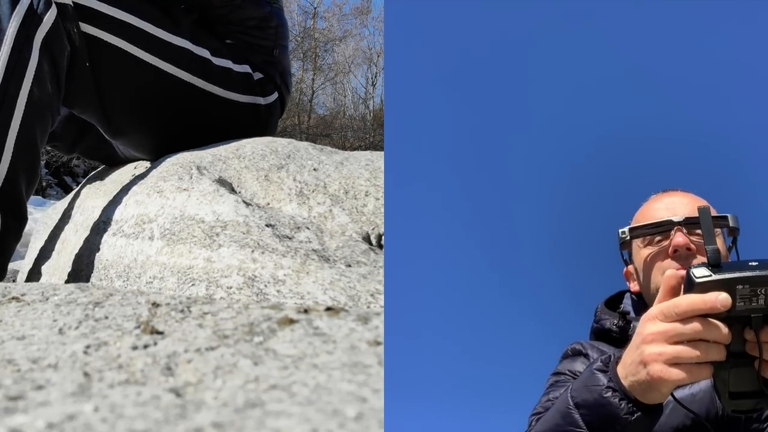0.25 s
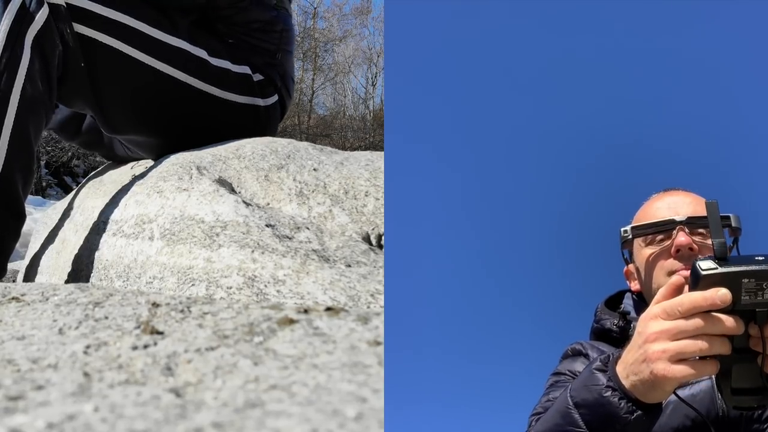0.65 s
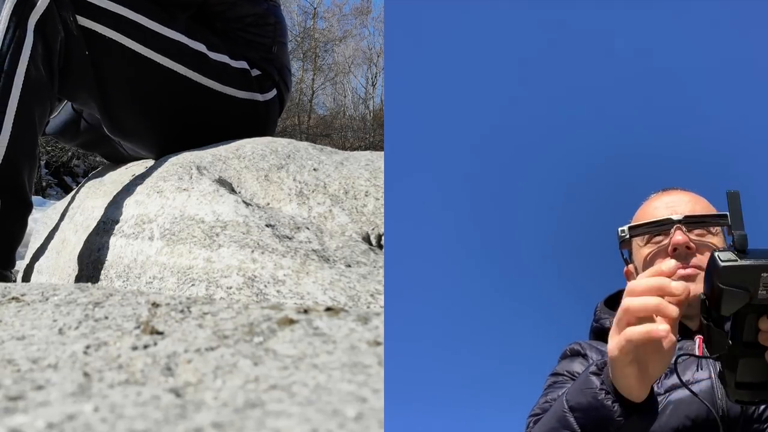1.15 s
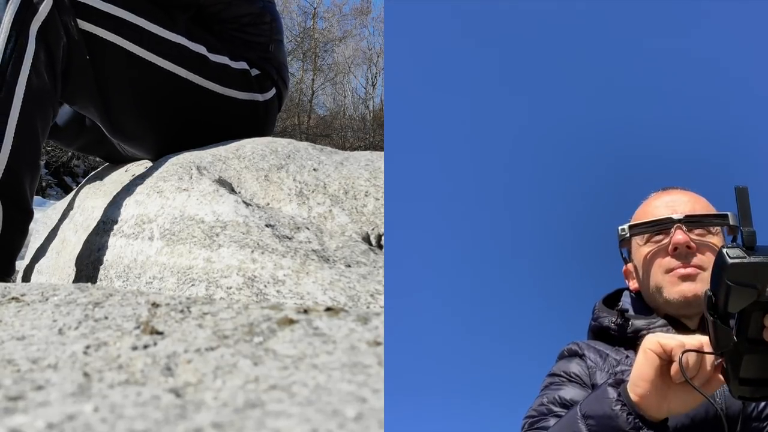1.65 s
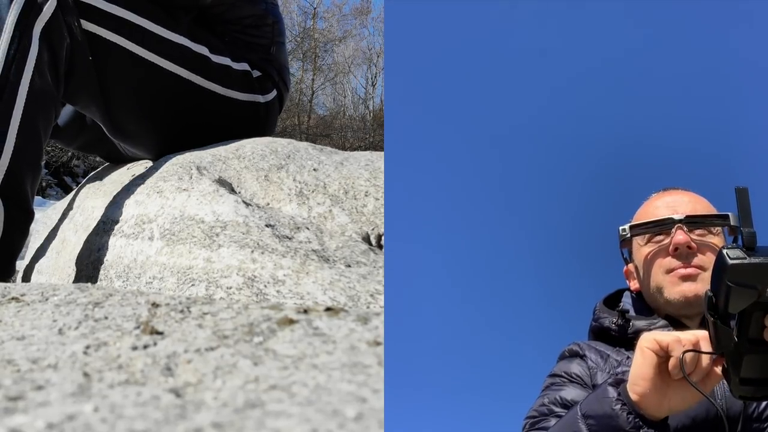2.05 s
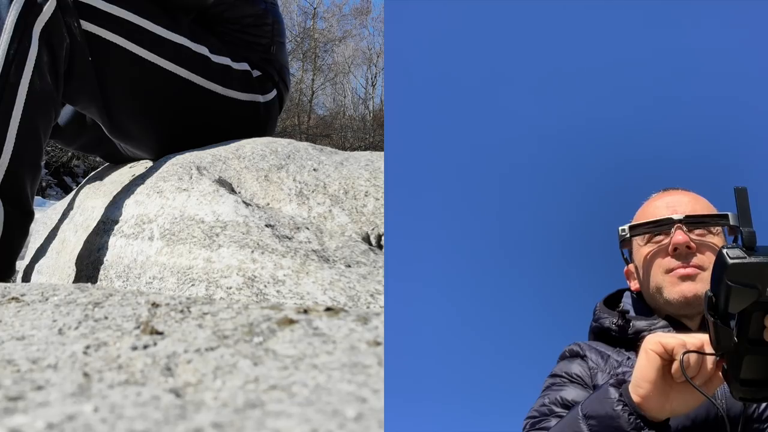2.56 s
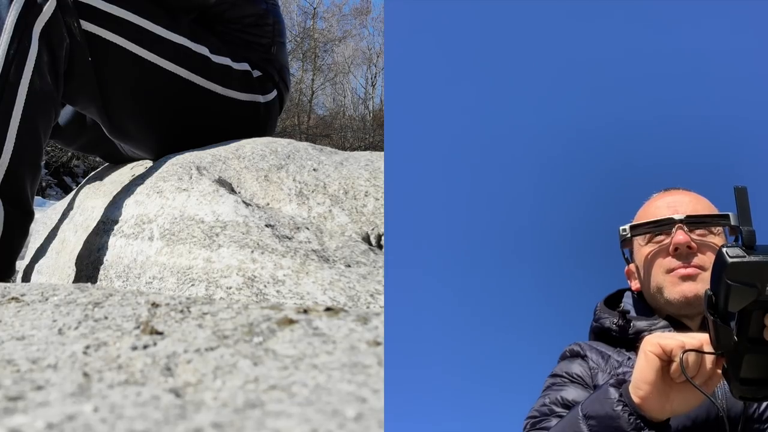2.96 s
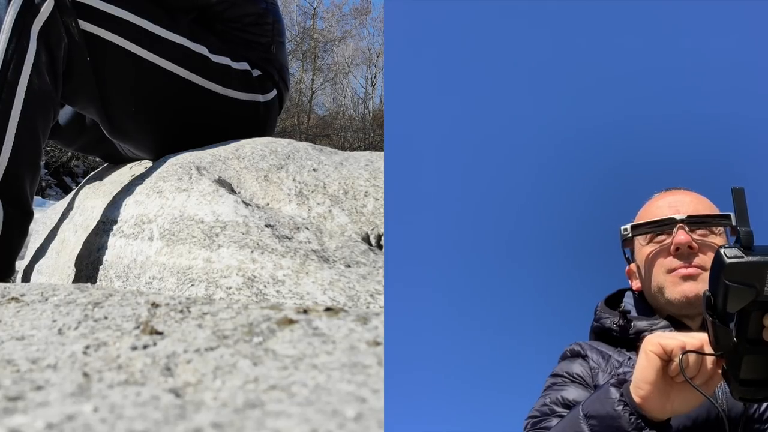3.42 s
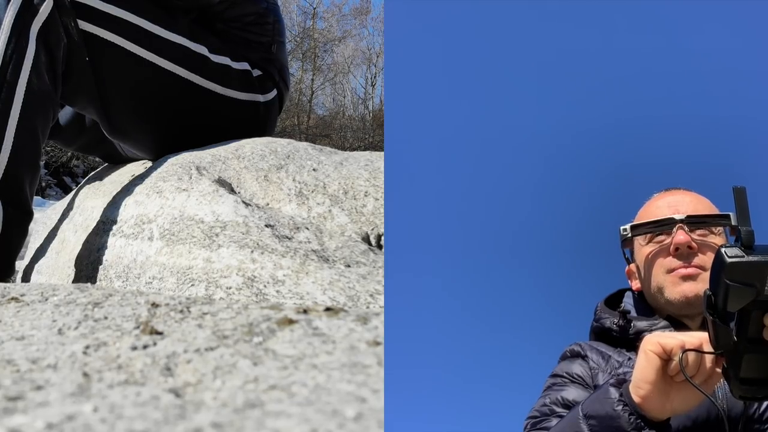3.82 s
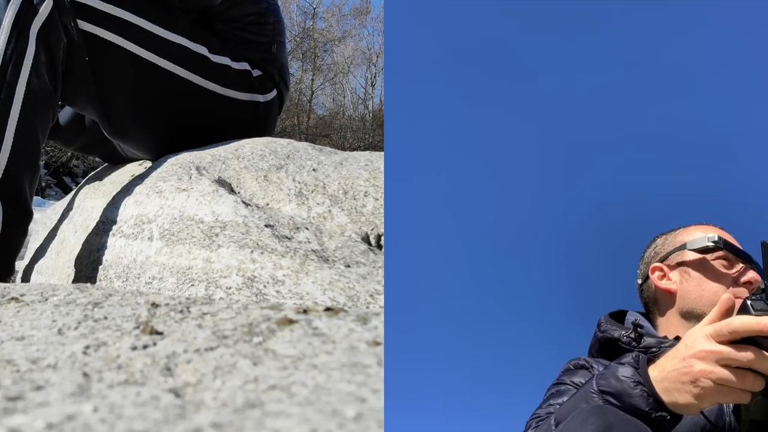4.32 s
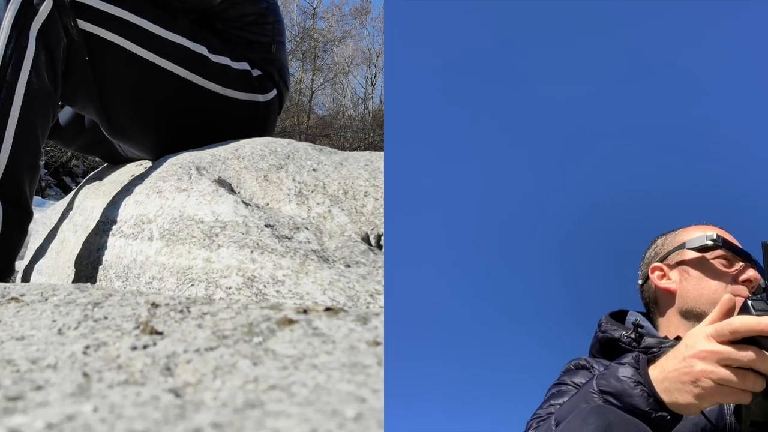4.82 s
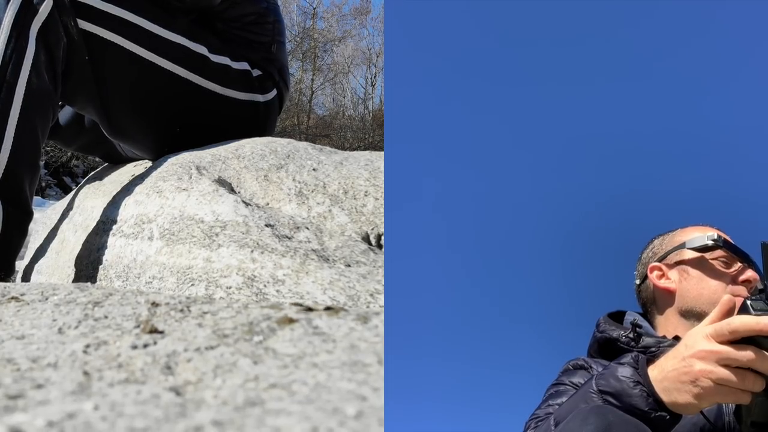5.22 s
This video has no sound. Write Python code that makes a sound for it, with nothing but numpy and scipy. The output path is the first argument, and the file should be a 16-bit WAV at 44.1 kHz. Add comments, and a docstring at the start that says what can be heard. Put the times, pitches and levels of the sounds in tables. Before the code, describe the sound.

Gusty wind and faint fan noise under a deep unsteady hum, until a small drone's whining, buzzing propellers suddenly burst in, climb and level off.

```python
"""Four two-blade rotors speed up in pairs on a hillside: shaft and blade tones are sines that follow each
rotor's speed, motor whine passes through the frame's resonances, and blade hiss is noise the blades chop.
They enter at a cut, already turning. Ahead of it a low machine hum of wavering sines is heard and a sleeve
rustles once (grainy noise); after it another low hum, on 35 Hz multiples, throbs under the rotors.
Wind rumble and a small cooling fan (coloured noise, thin tones) run throughout; two microphone ports
a hand apart hear most of it with a small lag."""
import sys
import numpy as np
from scipy import signal
from scipy.fft import rfft, irfft
from scipy.io import wavfile
from scipy.ndimage import uniform_filter1d

SR = 44100
rng = np.random.default_rng(int(sys.argv[2]) if len(sys.argv) > 2 else 0)


def generate_wav(signal):
    """Clip the signal to [-1, 1] and save it as 16-bit WAV at the path in sys.argv[1]."""
    frames = np.transpose(np.atleast_2d(signal))
    scaled = np.clip(frames, -1, 1) * 32767
    pcm = np.round(scaled).astype(np.int16)
    wavfile.write(sys.argv[1], SR, pcm)


N = 241646
T = np.arange(N) / SR
F = np.maximum(np.fft.rfftfreq(N, 1 / SR), 1)  # at least 1 Hz, so that its logarithm exists

CUT_S = 4.3  # a cut: the rotors are heard from here, already turning
FULL_HZ = 362.4  # blade rate at which the rotor levels are stated
LAG_S = 20.5 / SR  # between the ports

# Rotor balance at the ports: (frequency [Hz], left minus right [dB])
ROTOR_PAN = [(110, 4), (200, -2), (380, -3.5), (700, -12), (1000, -10), (1280, -2), (4400, -0.1), (7600, 1),
             (8300, 4.5), (10500, 0.1)]
# Likeness of fan and sleeve noise at the ports: (frequency [Hz], share common to both ports [0-1])
FAN_ALIKE = [(300, 0.6), (1000, 0.21), (3000, 0.41), (5000, 0.07), (9000, 0.74), (12000, 1)]


def rotors():
    """Each rotor sounds at multiples of its blade rate, and all four chop one bed of air noise."""
    # Motion and tones: (pulls ahead at [s], by [Hz], settles at [s], idle blade rate [Hz],
    # blade tone [dB], overtones [dB], tone change at idle [dB], overtone change at idle [dB],
    # fainter before pulling ahead [dB])
    motions = [(4.89, 0, 5.06, 350, -18.5, -24.5, -8, -3, 0), (4.9, 0, 5.12, 327, -32, -26, 3, -4, -0.5),
               (4.84, 32, 5.06, 337, -27.5, -29, -9, -5, 20),
               (5.01, 20, 5.09, 365, -31.5, -32.5, 4.5, 6, 10)]
    # Place on the frame: (shaft tone at full speed [dB], whine offset [dB],
    # left minus right [dB], left leads [rad])
    seats = [(-38, -3.5, 0.2, 0.14), (-43, -3, 1, -0.7), (-42, -24.5, -1, -0.28), (-49, -7.5, 2.7, 0.21)]
    # run-up of a pair: (blade rate at the cut [Hz], rate aimed at [Hz], time constant [s],
    # overtone growth [dB per tenfold speed])
    fast_pair, slow_pair = (165, 410, .45, 66), (124, 424, .7, 40)
    pairs = (fast_pair, slow_pair, slow_pair, fast_pair)
    pull_s = 0.0799  # time taken to pull ahead
    swell_s, swell_db = 0.062, 7  # the blade tones swell just after the cut
    tone_growth_db, waver_db = 30, 2.5  # growth per tenfold speed

    tones, chop, gate = 0, 0, ramp(CUT_S, 0.0053)
    for pair, motion, seat in zip(pairs, motions, seats):
        *run_up, over_growth_db = pair
        ahead_at_s, ahead_hz, idle_s, idle_hz, *levels = motion
        tone_db, over_db, tone_idle_db, over_idle_db, hidden_db = levels
        shaft_db, whine_db, seat_pan_db, seat_lead = seat

        ahead = ramp(ahead_at_s, pull_s)
        hz, idle = blade_rate(*run_up, ahead_hz * ahead, idle_s, idle_hz)
        speed = np.log10(hz / FULL_HZ)
        hidden = hidden_db * (1 - ahead) + swell_db * (1 - ramp(CUT_S, swell_s))
        tone_db = tone_db + tone_growth_db * speed + tone_idle_db * idle - hidden + waver_db * walk(16)
        over_db = over_db + over_growth_db * speed + over_idle_db * idle - hidden + waver_db * walk(16)

        hz = hz * (1 + 0.00299 * walk(40))
        tones = tones + shaft(hz, shaft_db) + blades(hz, tone_db, over_db, seat_pan_db, seat_lead)
        tones = tones + whine(hz, whine_db, gate)
        chop = chop + np.sin(2 * np.pi * (np.cumsum(hz) / SR + rng.random()))
    # the hiss grows with the speed of the last, fastest rotor
    return gate * (tones + blade_hiss(speed, idle, chop))


def blade_rate(cut_hz, aim_hz, tau_s, ahead_hz, idle_s, idle_hz):
    """A rotor runs up with its pair, may pull ahead, then settles to an idle rate that creeps upward."""
    ease_s = .04  # the run-up eases in over this time
    settle_s, creep_s, creep_hz_per_s = .045, 5.22, 68
    run = np.clip(T, CUT_S, idle_s) - CUT_S
    run = run - ease_s * (1 - np.exp(-run / ease_s))
    running_hz = aim_hz - (aim_hz - cut_hz) * np.exp(-run / tau_s) + ahead_hz
    idle = 1 - np.exp(-np.maximum(T - idle_s, 0) / settle_s)
    creeping_hz = idle_hz + creep_hz_per_s * np.maximum(T - creep_s, 0)
    return running_hz + idle * (creeping_hz - running_hz), idle


def shaft(hz, shaft_db):
    """Unbalance shakes the frame once a turn (half the blade rate), growing steeply with speed."""
    shake_db = shaft_db + 60 * np.log10(hz / FULL_HZ)
    once = tone(hz / 2, shake_db + 2.6 * walk(15), .4, -0.18)
    return once + tone(3 * hz / 2, shake_db - 14.0 + 4.6 * walk(13), -5.5, -2.6)


def blades(hz, tone_db, over_db, seat_pan_db, seat_lead):
    """Passing blades give a tone and overtones; the overtones take on the body's resonances."""
    # Blade harmonics: (multiple of the blade rate [1], over the tone or overtone level [dB])
    harmonics = [(1, -0.5), (2, -4), (3, -10), (4, -13), (5, -15.5), (6, -16), (7, -16), (8, -25)]
    # Body resonances on the overtones: (centre [Hz], width [Hz], lift [dB])
    body = [(762, 223, 6.5), (1050, 180, 3), (1240, 130, -9), (1470, 260, 7)]
    # Phase of the rotors at the ports: (frequency [Hz], left leads [rad])
    port_lead = [(100, 0.4), (400, 0.13), (600, -2.5), (1000, -3), (1720, -5), (3000, -6)]
    out = 0
    for m, db in harmonics:
        # gusts through the disc shake the higher orders more
        db = (tone_db if m == 1 else over_db) + db + 1.39 * m ** 0.65 * walk(45)
        pan_db = over_hz(ROTOR_PAN, m * hz) + seat_pan_db
        lead = over_hz(port_lead, m * hz) + seat_lead
        heard = tone(m * hz + 2.5 * (m - 1) * walk(70), db, pan_db, lead)
        out = out + heard * (lift(m * hz, body) if m > 1 else 1)
    return out


def whine(hz, whine_db, gate):
    """Motor tones sweep through the frame's resonances and fade as the motors stop pulling up."""
    # Motor tones: (multiple of the blade rate [1], level off resonance before offset and fade [dB])
    motor_tones = [(14, -50), (48.5, -66.5)]
    # Frame resonances: (centre [Hz], width [Hz], lift [dB])
    frame = [(2400, 330, 14), (2750, 150, 7), (8900, 330, 29)]
    fade_db = -26  # per second
    out = 0
    for m, db in motor_tones:
        db = db + whine_db + fade_db * (T - CUT_S) * gate + 2.0 * walk(50)
        shaken_hz = m * hz * (1 + 0.0046 * walk(90))
        heard = tone(shaken_hz, db, over_hz(ROTOR_PAN, m * hz), -2 * np.pi * m * hz * LAG_S)
        out = out + lift(m * hz, frame) * heard
    return out


def blade_hiss(speed, idle, chop):
    """Air noise, bright tips over a lower wash, swelling as the blades pass and growing with speed."""
    # Colour of the wash: (frequency [Hz], relative level per Hz [dB])
    wash_colour = [(60, 4.5), (250, -7), (500, -14), (800, -2.5), (1230, 0), (1600, -1.7), (2500, -1.5),
                   (2900, -6.5), (3600, -13), (5500, -80)]
    # Body resonances lent to the wash: (centre [Hz], width [Hz], lift [dB])
    shell = [(1240, 110, -6), (1550, 200, 4), (2450, 250, 3.5), (3310, 180, 6)]
    # Colour of the tips: (frequency [Hz], relative level per Hz [dB])
    tip_colour = [(2000, -22), (3400, -3.5), (4300, -2.5), (5400, -0.5), (7400, -5.5), (8200, 2.1),
                  (10000, -1), (13000, -5), (15700, -6)]
    # Likeness of the hiss at the ports: (frequency [Hz], share common to both ports [0-1])
    hiss_alike = [(300, 0.95), (2500, 0.73), (3700, 0.24), (8000, 0.72), (10300, 0.57), (11200, 1),
                  (15000, 0.64)]
    # growth per tenfold speed; the last is the wash's change at idle
    tips_db, tips_growth_db, wash_db, wash_growth_db, wash_idle_db = -28.5, 64, -25.5, 51.5, -4

    alike, pan_db = over_hz(hiss_alike), over_hz(ROTOR_PAN)
    tips = unit(air(undb(over_hz(tip_colour)), alike, pan_db))
    tips = tips * undb(tips_db + tips_growth_db * speed + 0.77 * chop + 0.57 * walk(30))
    wash = unit(air(undb(over_hz(wash_colour)) * lift(F, shell), alike, pan_db))
    wash_db = wash_db + wash_growth_db * speed + wash_idle_db * idle
    return tips + wash * undb(wash_db + 1.6 * chop + 1.44 * walk(30))


def hum():
    """Low lines that waver in level and a little in pitch; the left port hears them slightly late."""
    # Pitch: (time [s], upper line [Hz], lower line [Hz])
    pitch = [(0, 81.5, 44), (.5, 77.26, 47), (.72, 73.92, 48.5), (4.29, 72.92, 49), (4.31, 70.45, 35),
             (5.48, 70.3, 35)]
    # Levels until the cut, before the dips:
    # (time [s], upper line [dB], its octave [dB], lower line [dB])
    line_levels = [(0, -33.5, -39, -34.5), (.55, -30.5, -35.5, -35.5), (.7, -28.5, -42.5, -40.5),
                   (.9, -23, -42.5, -39), (1.4, -25.5, -41, -36), (1.7, -27.5, -46, -33.5),
                   (2.1, -28, -41.5, -36.5), (2.5, -32, -46, -35.5), (2.8, -28, -41, -34.5),
                   (3.4, -26.5, -44.5, -37), (4.3, -27.5, -45.5, -37)]
    # Brief dips: (centre [s], length [s], upper depth [dB], octave depth [dB], lower depth [dB])
    brief_dips = [(.15, 0.077, 0.5, -1, 24), (0.238, 0.075, 11, 0, 0), (0.392, 0.098, 15, 0, 14),
                  (0.652, 0.068, 1, 8, 12), (1.61, .1, 2.5, 8, 4), (1.775, 0.073, 17, 0, 0),
                  (1.895, .1, 7.5, 0.5, 17), (2.688, 0.073, 3.5, 0, 24), (3.05, 0.093, -1, 0.5, 16),
                  (3.529, .09, 17, 12, 7), (3.787, 0.071, 8.5, 0, 0), (4.14, .07, 0, 0, 8.5)]
    # after the cut the upper line throbs, ever slower and fainter,
    # over a lower line and its third multiple; fades and rises are per second
    throb_peak_s, throb_per_s, throb_slowing, throb_depth_db = 4.39, 6.31, 1.05, 14.5
    throb_db, throb_fade_db = -21, -7.5
    low_db, low_rise_db, third_db, third_rise_db = -41, 3, -37, -7

    (upper, lower), _ = over_time(pitch)
    levels, early = over_time(line_levels)
    for s, length, *depth in brief_dips:
        levels = levels - np.exp(-(2 * (T - s) / length) ** 2) * np.array(depth)[:, None]
    lines = [(hz, db, early) for hz, db in zip((upper, 2 * upper, lower), levels)]

    late, since, u = ramp(CUT_S, .006), T - CUT_S, T - throb_peak_s
    throb = np.sin(np.pi * (throb_per_s * u - throb_slowing * u ** 2)) ** 2
    lines += [(upper, throb_db + throb_fade_db * since - throb_depth_db * throb, late),
              (lower, low_db + low_rise_db * since, late),
              (3 * lower, third_db + third_rise_db * since, late)]
    out = 0
    for hz, db, gate in lines:
        out = out + gate * tone(hz * (1 + 0.0057 * walk(15)), db + 1.3 * walk(14), .7, -.004 * hz)
    return out


def sleeve():
    """Nylon swish, thin at first and then broad, with a dull rub under it; all grainy noise."""
    # Strokes: (start [s], attack [s], hold [s], release [s],
    # thin swish [dB], broad swish [dB], low rub [dB])
    strokes = [(1.05, .14, 0.13, 0.19, -58, -66, -55), (1.243, 0.12, 0.082, .095, -67.5, -48.5, -44)]
    # Colours of thin swish, broad swish and rub: (frequency [Hz], relative level per Hz [dB])
    thin = [(2500, -24), (4500, -5.5), (5800, -1.5), (8000, -0.5), (11000, -13), (15500, -20)]
    broad = [(700, 5.5), (1500, 4), (3000, -8), (6000, -9), (10000, -9), (15500, -24)]
    rub = [(120, -14), (230, 3.2), (450, -1.5), (700, -10), (1200, -25)]
    stroke_range_db, rub_lag_s = 27, 0.028

    levels = 0
    for s, attack, hold, release, *db in strokes:
        shape = ramp(s, attack) - ramp(s + attack + hold, release)
        stroke_db = np.array(db)[:, None] - stroke_range_db * (1 - shape)
        levels = levels + (shape > 0) * undb(stroke_db)
    levels[-1] = np.interp(T - rub_lag_s, T, levels[-1])  # the dull rub trails the swish

    alike, out = over_hz(FAN_ALIKE), 0
    for colour, gain, grain_db in zip((thin, broad, rub), levels, (1.6, 1.8, 3.2)):
        out = out + unit(air(undb(over_hz(colour)), alike)) * gain * undb(grain_db * walk(49.76))
    return out


def fan():
    """Air noise coloured by the case, with thin steady tones."""
    # Air noise before the case: (frequency [Hz], level per Hz [dB])
    air_colour = [(200, -99), (600, -88), (1100, -85.5), (1750, -100.5), (2200, -98), (3000, -99),
                  (4000, -108), (7500, -112), (8200, -107), (11000, -114), (15500, -118)]
    # Case resonances: (centre [Hz], width [Hz], lift [dB])
    case = [(1512, 320, 11), (1937, 152, 14), (2420, 207, 13), (2748, 110, 10.5), (3143, 160, 8.5),
            (3462, 183, 12.5), (1186, 150, -5.5)]
    # Thin tones: (frequency [Hz], level [dB])
    thin_tones = [(1087.3, -69), (1359.4, -75), (2718, -74)]
    out = air(undb(over_hz(air_colour)) * lift(F, case), over_hz(FAN_ALIKE), -1.3) * undb(0.7 * walk(9))
    for hz, db in thin_tones:
        out = out + tone(hz * (1 + 0.00037 * walk(3.3)), db + 0.64 * walk(5), 2.5, -0.3)
    return out


def wind():
    """Gusty rumble on the ports: low noise, slowly and quickly uneven in level."""
    # Rumble: (frequency [Hz], level per Hz [dB])
    rumble = [(20, -72), (60, -53.5), (110, -62), (180, -71), (260, -81.5), (450, -90.5), (900, -100)]
    return air(undb(over_hz(rumble)) * (F < 1500), 1.0) * undb(0.4 * walk(3.52) + 0.63 * walk(14))


def tone(hz, db, pan_db=0., lead=0.):
    """A sine of moving pitch and rms level at both ports; lead is in radians, left ahead."""
    phase = 2 * np.pi * (np.cumsum(hz) / SR + rng.random())
    left = undb(pan_db / 2) * np.sin(phase + lead / 2)
    right = undb(-pan_db / 2) * np.sin(phase - lead / 2)
    return np.sqrt(2) * undb(db) * np.array([left, right])


def air(gain, alike, pan_db=0.):
    """Noise of a given colour at both ports: a common part with the port lag, the rest unrelated."""
    # left lags below the split, right above it
    split_hz, treble_lag_s, treble_turn = 8300, 19 / SR, 4.06  # turn in radians
    common, left, right = rfft(rng.standard_normal((3, N))) * gain * np.sqrt(SR / 2)
    treble = 2 * np.pi * F * treble_lag_s + treble_turn
    turn = np.where(F < split_hz, -2 * np.pi * F * LAG_S, treble)
    share = np.clip(alike, 0, 1)
    ports = np.sqrt(share) * common * np.exp([.5j * turn, -.5j * turn])
    ports = ports + np.sqrt(1 - share) * np.array([left, right])
    return irfft(ports * undb(np.array([[.5], [-.5]]) * pan_db), N)


def lift(hz, modes):
    """Gain of a set of resonances at frequency hz."""
    return undb(sum(db / (1 + (2 * (hz - centre) / width) ** 2) for centre, width, db in modes))


def walk(rate):
    """Random levels held 1 / rate s and slewed twice; spread near 1."""
    k = int(SR / rate)
    held = np.repeat(rng.standard_normal(N // k + 1), k)
    return 1.3 * uniform_filter1d(uniform_filter1d(held, k), k)[:N]


def ramp(start_s, length_s):
    """0 before the start, 1 after the given length."""
    return np.clip((T - start_s) / length_s, 0, 1)


def over_time(table):
    """Columns of a table at every sample, and a gate that is open while it lasts."""
    s, *columns = np.transpose(table)
    gate = np.clip((T - s[0]) / .006, 0, 1) * np.clip((s[-1] + .006 - T) / .006, 0, 1)
    return [np.interp(T, s, c) for c in columns], gate


def over_hz(table, at_hz=F):
    """A (frequency, value) table read at other frequencies, straight on a logarithmic scale."""
    hz, value = np.transpose(table)
    return np.interp(np.log(at_hz), np.log(hz), value)


def undb(db):
    """Gain of a level in dB."""
    return 10 ** (np.asarray(db) / 20)


def unit(x):
    """Scaled to rms 1."""
    return x / np.sqrt(np.mean(x ** 2))


def scene():
    """All sources at the two ports."""
    return rotors() + hum() + sleeve() + fan() + wind()


def record(dry):
    """A steep low-pass; nothing is heard above 15.6 kHz."""
    top_hz = 15600
    return signal.sosfilt(signal.ellip(10, .2, 70, top_hz, fs=SR, output="sos"), dry)


dry = scene()
out = record(dry)
generate_wav(out)
```